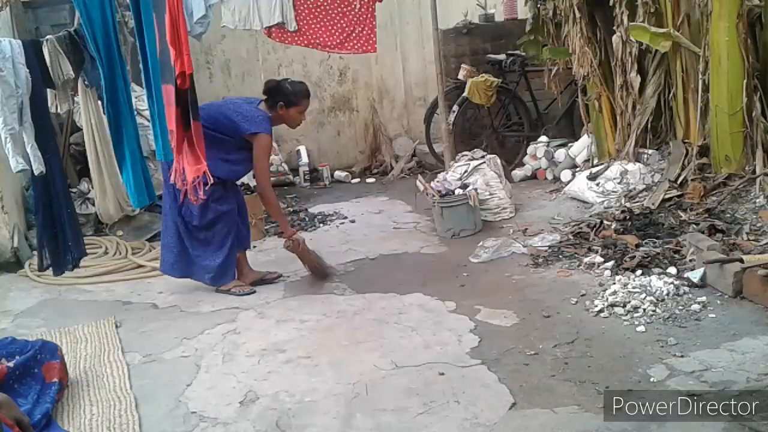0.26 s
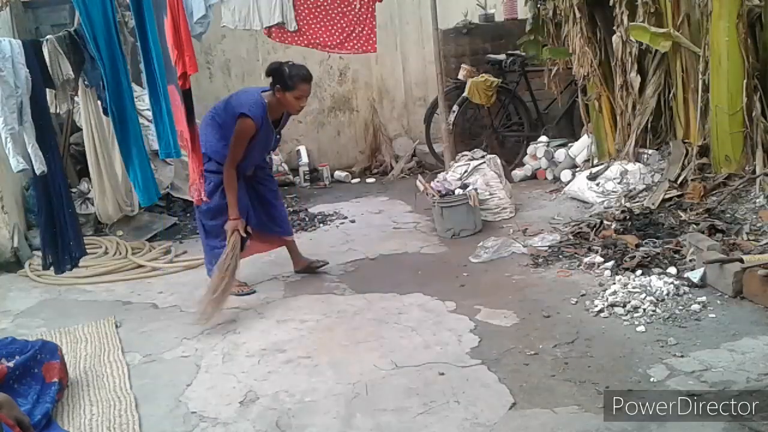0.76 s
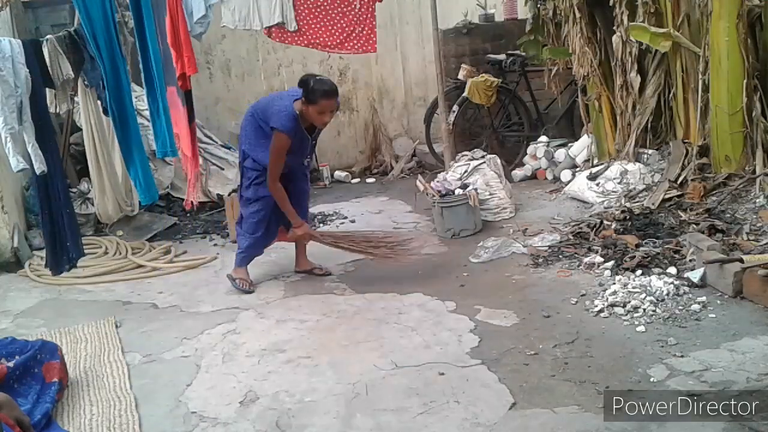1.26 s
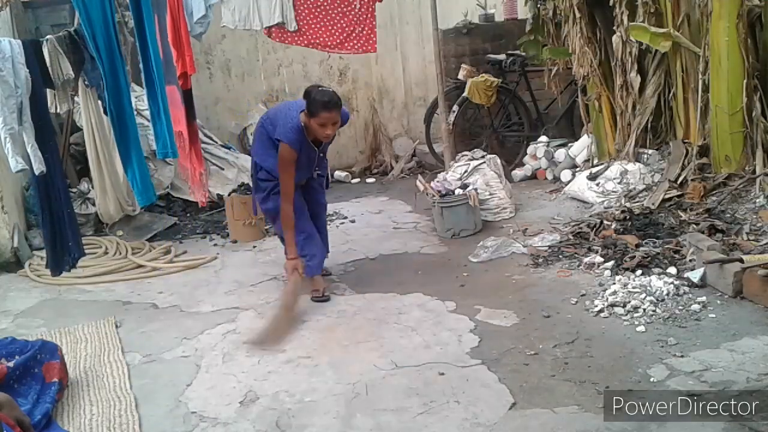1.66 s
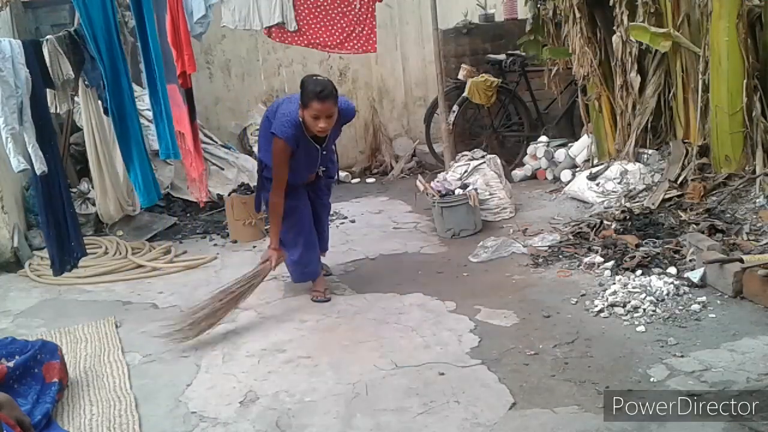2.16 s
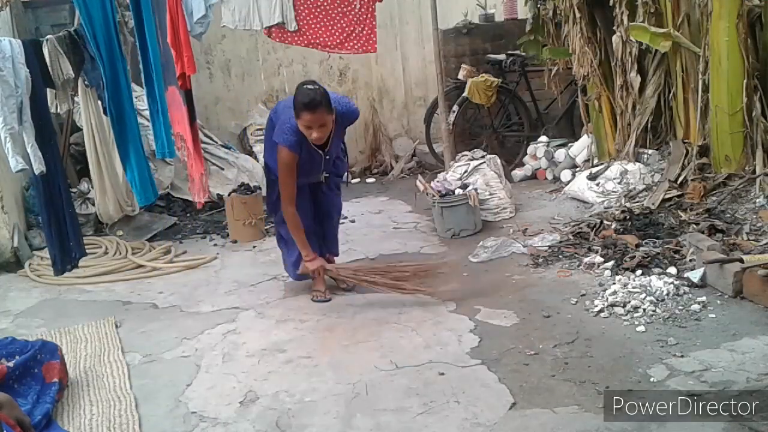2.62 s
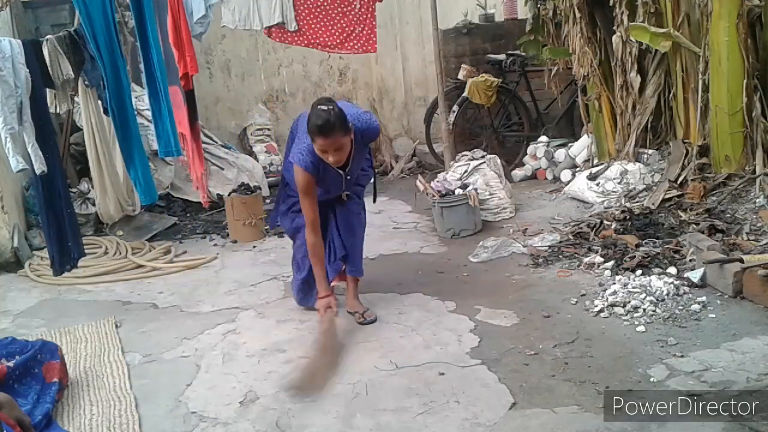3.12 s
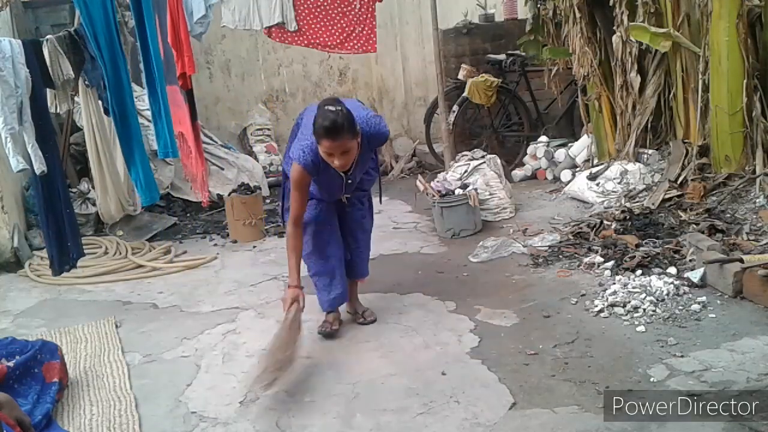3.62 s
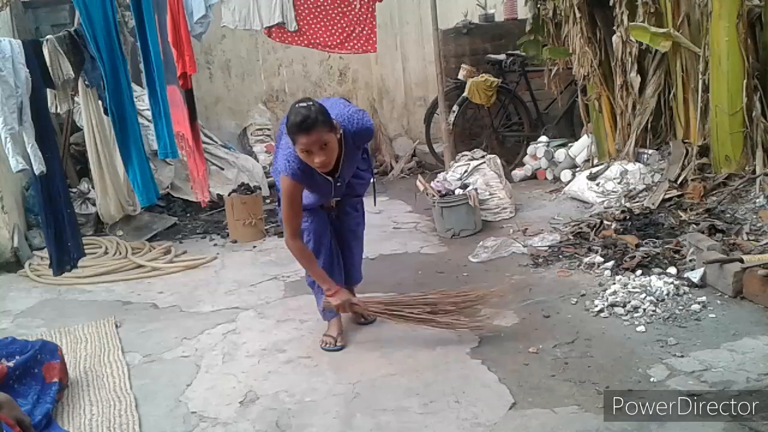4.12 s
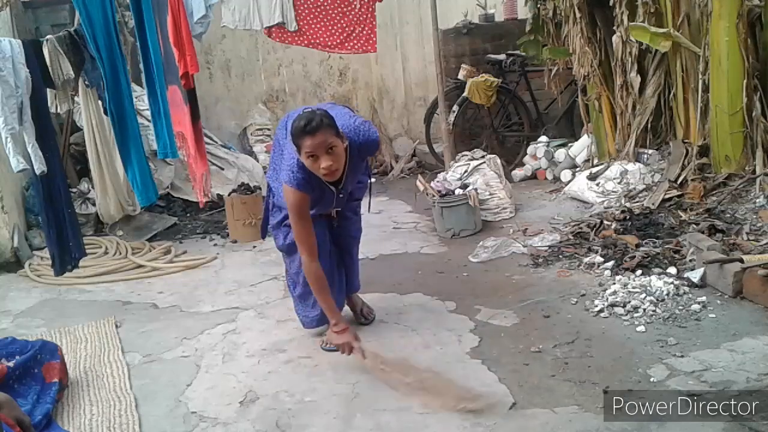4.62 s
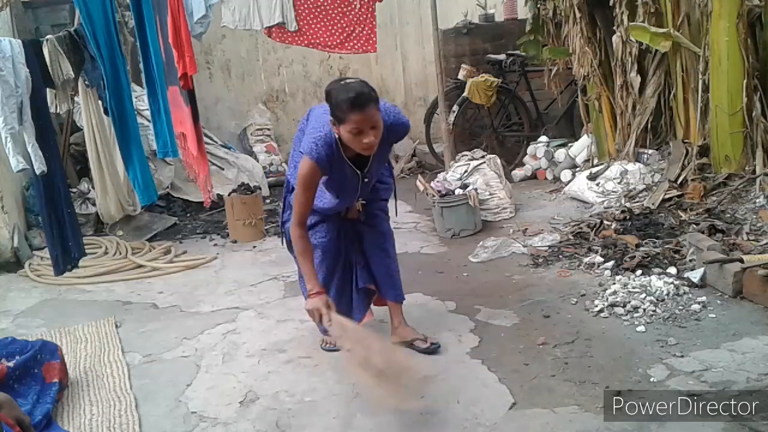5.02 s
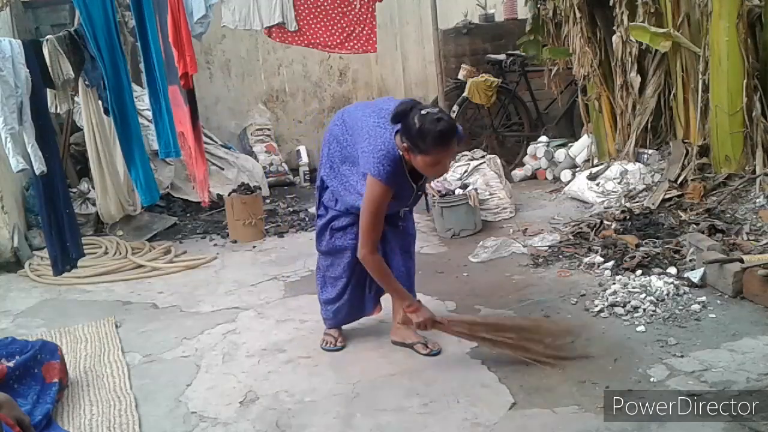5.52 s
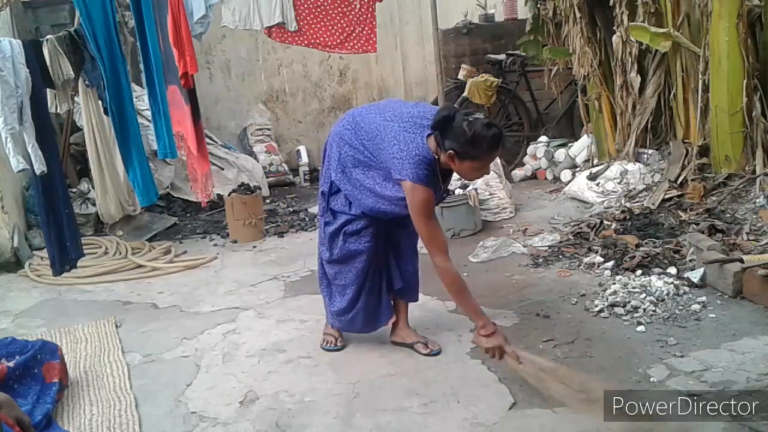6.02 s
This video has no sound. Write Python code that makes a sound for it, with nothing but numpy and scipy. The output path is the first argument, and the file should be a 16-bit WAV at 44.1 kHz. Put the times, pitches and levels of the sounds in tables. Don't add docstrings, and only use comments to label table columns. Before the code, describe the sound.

Dry swishing broom strokes scrape across a walled yard, with scuffs, tiny stone ticks, faint bangle clinks, far crows and low traffic rumble.

```python
import sys
import numpy as np
from scipy import signal
from scipy.io import wavfile
from scipy.ndimage import uniform_filter1d

SR = 44100
rng = np.random.default_rng(int(sys.argv[2]) if len(sys.argv) > 2 else 0)


def int16_out(signal):
    q = np.round(np.clip(np.atleast_2d(signal).T, -1, 1) * 32767)
    wavfile.write(sys.argv[1], SR, q.astype(np.int16))


def invert_db(level):
    return 10 ** (np.asarray(level, dtype=float) / 20)


N = 276727


def evened(x):
    return x / np.sqrt(np.mean(x ** 2) + 1e-20)


def read(points, hz):
    f, value = np.transpose(points)
    return np.interp(np.log(hz + 1), np.log(f + 1), value)


def follow(points, t):
    return np.interp(t, *np.transpose(points))


def add(mix, s, sound):
    part = mix[round(s * SR):][:len(sound)]
    part += sound[:len(part)]


def resonate(x, hz, width):
    turn = np.exp(2j * np.pi * np.cumsum(hz * np.ones(len(x))) / SR)
    r = np.exp(-np.pi * width / SR)
    return 2 * (turn * signal.lfilter([1 - r], [1, -r], x / turn + 1e-18)).real


def steep(x, hz, width):
    return resonate(resonate(resonate(x, hz, width), hz, 2 * width), hz, 3 * width)


def shaped(x, field_db, size=256):
    overlap = size * 3 // 4
    hz, s, z = signal.stft(x, SR, nperseg=size, noverlap=overlap)
    z = z * invert_db(field_db(hz[:, None], s[None]))
    return signal.istft(z, SR, nperseg=size, noverlap=overlap)[1][..., :x.shape[-1]]


def smooth_noise(count, width):
    return evened(uniform_filter1d(rng.standard_normal(count), width))


def patches(shape, tall, wide):
    blobs = rng.standard_normal(shape[::-1]).T
    return evened(uniform_filter1d(uniform_filter1d(blobs, tall, 0), wide, 1))


def arch(t, top_at):
    return np.sin(np.pi / 2 * np.interp(t / t[-1], [0, np.clip(top_at, .1, .9), 1], [0, 1, 2]))


# pitch_hz, level_db (per Hz)
TOWN_AIR = [(35, -1), (92, -4.5), (263, -4), (461, -14), (750, -11.5), (1100, -12), (1780, -11),
            (2240, -18), (3370, -22), (4820, -30.5), (7250, -36), (9130, -48), (11500, -40), (15600, -43)]
# time_s, level_db
FLOCK = [(0, 2), (1.0, 1.5), (1.7, 3), (2.3, -2.5), (3.0, -1), (3.7, -1.5), (4.5, -4), (5.2, 1.5),
         (6.27, 7)]
# pitch_hz, width_hz, level_db
DRONES = [(57.7, 11, -4.5), (79.1, 8.3, 0), (96.6, 27, 0), (123.6, 11.5, -6.5), (156.6, 8.6, -11),
          (181.5, 4.3, -8)]
# time_s, level_db
SURGES = [(0.0, -46), (0.3, -48.5), (0.72, -50.5), (1.17, -49), (1.8, -49.5), (2.1, -51.5), (2.74, -49.5),
          (3.16, -51.5), (3.53, -50.5), (4.07, -52), (4.28, -54.5), (4.93, -52), (5.5, -54), (6.05, -48.5)]


def town():
    def air_db(hz, t):
        flock_db = follow(FLOCK, t) / (1 + ((hz - 1670) / 750) ** 4)
        return read(TOWN_AIR, hz) + flock_db + 1.34 * patches((hz.size, t.size), 30, 10)

    air = shaped(rng.standard_normal(N), air_db, size=2048)
    drones = 0
    for hz, width, db in DRONES:
        drone = resonate(resonate(rng.standard_normal(N), hz, width), hz, 2 * width)
        drones = drones + invert_db(db) * evened(drone)
    t = np.arange(N) / SR
    fall_db_per_s, floor_db = 37, -58.5
    swell_db = np.max([db - fall_db_per_s * abs(t - s) for s, db in SURGES], axis=0)
    return invert_db(-56.5) * evened(air) + invert_db(np.maximum(swell_db, floor_db) - 2.5) * evened(drones)


# pitch_hz, level_db (per Hz)
OWN_HISS = [(60, -5), (100, -30), (266, 10.5), (900, -1.5), (3500, 0), (5500, -11.5), (8300, -21.5),
            (11800, -8), (15600, -7)]
# start_s, low_hz, high_hz, level_db
SPLITS = [
    (1.107, 12400, 14470, -50),
    (1.851, 6200, 7580, -44),
    (2.571, 5770, 7580, -44.5),
    (3.337, 8870, 10340, -54.5),
    (3.407, 5200, 6890, -45),
    (3.43, 4220, 5200, -49),
    (3.871, 5690, 7580, -58),
    (4.707, 5690, 7580, -48),
    (4.8, 10940, 12400, -54),
    (5.473, 5690, 6890, -48.5),
]


def difference():
    side = invert_db(-78) * evened(shaped(rng.standard_normal(N), lambda hz, t: read(OWN_HISS, hz) + 0 * t))
    for s, low, high, db in SPLITS:
        band_pass = signal.butter(6, (low, high), "band", fs=SR, output="sos")
        band = signal.sosfiltfilt(band_pass, rng.standard_normal(2048))
        add(side, s, invert_db(db) * evened(band) * signal.windows.hann(2048) * 1.5)
    return np.array([side, -side])


# start_s, length_s, level_db at the top, beak opening (factor on the throat), hoarseness at the top (0-1)
CAWS = [(0, .34, -54, .62, .85), (.5, .3, -58, .62, .9), (.12, .36, -53, 1.04, .9),
        (.45, .32, -47, 1.0, .8), (.76, .3, -54, 1.04, .8), (1.0, .25, -48, .95, .9),
        (1.75, .2, -52, .85, .9), (2.2, .16, -59, .97, .7), (4.72, .34, -57, 1.0, .8),
        (5.26, .26, -48, 1.12, .6), (5.7, .2, -52, 1.0, .8), (6.02, .16, -51, 1.15, .7),
        (2.33, .27, -50, .99, .35), (5.862, .13, -48, 1.0, .18), (5.957, .11, -47, .99, .18)]
# pitch_hz, width_hz, level_db
THROAT = [(1140, 100, -1), (1540, 250, 2), (1880, 300, -3.5)]
# pitch_hz, width_hz, level_db
NASAL = (3850, 260, -13.5)


def caw(start, length, top_db, opening, top_hoarse):
    t = np.arange(0, length, 1 / SR)
    slack = 1 - arch(t, .45)
    effort_db = top_db - 14 * slack
    rattle_hz = 77 * (1 - .02 * t / length)
    beak = opening * (1 + .02 * (t / length - .5))
    hoarse = np.clip(top_hoarse + 0.27 * slack, 0, 1)
    turns = np.cumsum(rattle_hz * (1 + .1 * hoarse * smooth_noise(len(t), 600))) / SR
    slaps = np.diff(np.floor(turns), prepend=0)
    puffs = (hoarse + np.exp(-(turns % 1) / 0.63)) * rng.standard_normal(len(t))
    drive = (1 - hoarse) * evened(slaps - slaps.mean()) + hoarse * evened(puffs)
    voice = invert_db(NASAL[2]) * steep(drive, *NASAL[:2])
    smear = 1 + .7 * top_hoarse
    for k, (hz, width, db) in enumerate(THROAT):
        voice = voice + (-1) ** k * invert_db(db) * steep(drive, hz * beak, width * smear)
    return start, invert_db(effort_db) * evened(voice) * signal.windows.tukey(len(t), .15)


# pitch_hz, level_db (per Hz)
BRISTLES = [(300, -25), (550, -21), (1000, -18.5), (1900, -10.5), (2500, -11), (3100, -8.5), (4000, -9),
            (5000, -9.5), (6200, -5.5), (8000, -9), (9500, -12), (12000, -10), (13000, -12.5), (15600, -11)]
TIPS_PER_S = 30000


def snaps(count, per_s, spread_db):
    size = invert_db(spread_db * np.minimum(rng.exponential(1, count), 4)) * rng.standard_normal(count)
    return evened(size * (rng.random(count) < per_s / SR))


def broom_colour(hz, rasp_db, fizz_db):
    low = 1 / (1 + (hz / 4700) ** 6)
    high = 1 / (1 + (9000 / (hz + 1)) ** 12)
    return read(BRISTLES, hz) + low * (rasp_db + 6.5) + high * (fizz_db + 7.5)


# start_s (landing), end_s (lift-off), start_level_db, end_level_db (pressure), rasp_db against the hiss
STROKES = [(0.01, 0.065, -38, -33.5, -3), (0.489, 0.539, -40.5, -40, 1), (1.123, 1.28, -39.5, -36.5, -3),
           (1.832, 2.02, -38.5, -37.5, -1), (2.519, 2.746, -37, -38, -3.5), (3.044, 3.06, -60, -54.5, -4),
           (3.242, 3.497, -37.5, -36, -4.5), (3.852, 3.9, -60, -54, 2), (3.968, 4.191, -40, -38.5, -2.5),
           (4.687, 4.916, -42, -38, -2.5), (5.08, 5.12, -62, -58.5, 2.5), (5.423, 5.635, -40, -35, -2.5),
           (6.05, 6.06, -63, -62, -10), (6.169, 6.267, -38.5, -29, -1.5)]
RASP_SHAPE = (4, 0, 0.5, -2.5, 6, 7)
FIZZ_SHAPE = (-11.5, -8, -4, -6.5, -7, -12)
# time_s, level_db
LITTER = [(0, 7.5), (0.6, 4.5), (1.3, 2), (2.0, -4.5), (2.7, -7), (3.5, -9), (4.2, -2.5), (5.0, 2),
          (5.7, 6.5)]
# time_s, level_db (extra pressure), half_length_s
LEANS = [
    (1.26, 4.5, .03),
    (1.95, 3, 0.12),
    (2.6, -2.5, 0.053),
    (2.697, 7, 0.032),
    (3.319, 4, 0.037),
    (4.04, -1, .03),
    (4.11, 5, 0.057),
    (4.74, -2.5, .02),
    (4.812, 4, .06),
    (5.49, -4, 0.021),
]


def stroke_controls(t):
    swing_s, catch_s = 0.071, 0.039
    let_go_s, settle_s = .16, 0.37
    air_s, touch_s = 0.17, 0.02
    power, rasp, fizz = 1e-12, 0, 0
    for land, lift, land_db, lift_db, rasp_db in STROKES:
        steps = [land - swing_s, swing_s - catch_s, catch_s, max(lift - land, .001), let_go_s, settle_s - let_go_s]
        s = np.cumsum(steps)
        litter_db = follow(LITTER, lift)
        times = [s[0] - air_s, s[0] - touch_s, *s, s[-1] + settle_s]
        levels = [land_db - 60, land_db - 30, land_db - 19, land_db - 7, land_db, lift_db,
                  lift_db - 26 + .3 * litter_db, lift_db - 43 + litter_db, lift_db - 60]
        own = invert_db(2 * np.interp(t, times, levels))
        light_db = 0.43 * min(land_db + 46, 0)
        power = power + own
        rasp = rasp + own * (rasp_db + np.interp(t, s, RASP_SHAPE))
        fizz = fizz + own * (np.interp(t, s, FIZZ_SHAPE) + light_db)
    lean_db = sum(db * np.clip(1 - abs(t - s) / half, 0, 1) for s, db, half in LEANS)
    return 10 * np.log10(power) + lean_db, rasp / power - 0.57 * lean_db, fizz / power - 0.42 * lean_db


def broom():
    s = np.arange(0, N + 64, 64) / SR
    press_db, rasp_db, fizz_db = stroke_controls(s)

    def field_db(hz, t):
        colour_db = broom_colour(hz, np.interp(t, s, rasp_db), np.interp(t, s, fizz_db))
        return colour_db + 1.25 * patches((hz.size, t.size), 5, 24)

    hiss = evened(shaped(snaps(N, TIPS_PER_S, 0.49), field_db))
    flutter_db = 0.65 * smooth_noise(N, 500) + 0.11 * smooth_noise(N, 90)
    return hiss * invert_db(np.interp(np.arange(N) / SR, s, press_db) - 0.5 + flutter_db)


# pitch_hz, t60_s
YARD = [(500, 0.7), (2000, 0.76), (7000, 0.5), (14000, 0.089)]


def yard(x):
    taps = np.zeros(SR // 2)
    at = np.arange(200, len(taps) - 20, 20)
    taps[at + rng.integers(0, 20, len(at))] = rng.choice([-1., 1.], len(at))
    tail = shaped(taps, lambda hz, t: -60 * t / read(YARD, hz))
    return signal.fftconvolve(x, tail / np.linalg.norm(tail))[:N]


# start_s, level_db (peak), t60_s, rasp_db, fizz_db
SCUFFS = [(2.999, -47, 0.29, -12, -20), (3.027, -39, 0.26, -11, -20), (3.8112, -35.5, 0.14, -14, -17),
          (3.924, -29, .15, -11, -2), (4.5017, -66, .15, -11, -13), (4.642, -37, 0.17, -16, -10),
          (5.071, -28.5, 0.13, -6, -10), (5.105, -39, 0.41, -6, -14), (5.135, -37, 0.27, -3, -6),
          (5.318, -43, 0.25, -19, -8), (6.104, -38, 0.16, -6, -6), (2.9514, -46, .03, -15, -4),
          (3.0874, -50, .03, -8, -3), (5.8394, -51, .03, -8, 0), (5.456, -20, 0.018, -10, -10),
          (2.3595, -49, .03, -8, -4), (3.12, -48, .2, -8, -12), (0.39, -48, .3, -4, -14),
          (0.64, -43, .3, -4, -10)]


def scuff(db, t60, rasp_db, fizz_db):
    t = np.arange(SR // 5) / SR
    grit = snaps(len(t), TIPS_PER_S, spread_db=2.0)
    grit = evened(shaped(grit, lambda hz, s: broom_colour(hz, rasp_db, fizz_db)))
    rise = np.minimum(t / (0.036 * t60), 1)
    return grit * invert_db(db - 15.0 - 60 * t / t60) * rise * np.linspace(1, 0, len(t))


# start_s, length_s, pitch_hz, level_db (top), glide_hz_per_s
COOS = [
    (4.74, .1, 1030, -65, -50),
    (5.3, .12, 900, -64, -140),
    (4.3, .3, 268, -67, -30),
    (4.68, .22, 563, -66, 20),
    (5.05, .25, 566, -64, -10),
    (5.18, .1, 750, -66, 0),
    (.8, .2, 3160, -77, -200),
    (4.47, .1, 3500, -76, 0),
]


def dove(start, length, hz, top_db, glide):
    t = np.arange(0, length, 1 / SR)
    tone = np.sin(2 * np.pi * np.cumsum(hz + glide * (t - length / 2)) / SR)
    waver_db = 2.6 * smooth_noise(len(t), 1200)
    level_db = top_db - 9 * (1 - arch(t, 0.35)) + waver_db
    return start, invert_db(level_db) * evened(tone) * signal.windows.tukey(len(t), .15)


# start_s, level_db (peak), pitch_hz, t60_s
TICKS = [
    (1.0295, -52, 1900, .01),
    (1.6402, -42, 1750, 0.0077),
    (2.1926, -40, 1510, 0.009),
    (2.3435, -50, 1460, .01),
    (3.0855, -49, 2580, .01),
    (3.089, -54, 2600, 0.0092),
    (4.598, -70, 1400, 0.009),
]


def tick(db, hz, t60):
    t = np.arange(1000) / SR
    modes = np.sin(2 * np.pi * hz * t) + 0.62 * np.sin(2 * np.pi * hz * 1.74 * t)
    return invert_db(db - 60 * t / t60) * modes


# start_s, level_db (peak), middle_db (middle modes against the upper)
CLINKS = [
    (2.3466, -67, -5),
    (2.3595, -57.5, 6),
    (3.0849, -58, -3),
    (5.876, -63, 0),
    (5.9235, -64, 4),
    (6.0292, -45.5, -2),
]
# pitch_hz, level_db, t60_s
BANGLE = [(3980, -12, .06), (5800, -3, .2), (6300, -6, .12), (7120, -17, .16), (7300, -4.5, 0.064),
          (8300, -16, .04), (10500, -14, .05), (10940, -8, 0.23), (11350, -2, .07), (11700, -3, 0.12),
          (12100, -12, .04), (13600, -13, .04), (15200, -11, .06)]


def clink(db, middle_db):
    t = np.arange(SR // 4) / SR
    ring = 0
    for hz, level, t60 in BANGLE:
        mode_db = level + middle_db * (6500 < hz < 9000) - 5 * (hz < 6500)
        for pair in (.996, 1.004):
            tone = np.sin(2 * np.pi * hz * pair * t + rng.uniform(0, 2 * np.pi))
            ring = ring + invert_db(mode_db - 60 * t / t60) * tone
    crack = np.diff(rng.standard_normal(len(t) + 1)) * invert_db(-3 - 60 * t / .035)
    knocks = np.zeros(400)
    knocks[rng.integers(60, 400, 2)] = 0.21
    knocks[0] = 1
    strike = (ring + crack) * np.minimum(t / 0.0011, 1)
    return invert_db(db - 10.5) * np.convolve(strike, knocks)


def scene():
    near, far = broom(), np.zeros(N)
    for rows, source in ((SCUFFS, scuff), (CLINKS, clink), (TICKS, tick)):
        for s, *rest in rows:
            add(near, s, source(*rest))
    for rows, source in ((CAWS, caw), (COOS, dove)):
        for row in rows:
            add(far, *source(*row))
    mid = near + 0.58 * far + yard(invert_db(-14) * near + 0.46 * far) + town()
    return np.array([mid, mid])


def band_limit(x):
    return signal.sosfilt(signal.butter(12, 16780, fs=SR, output="sos"), x)


def record(dry):
    port_hz, port_width_hz, port_gain = 7220, 768, 2.59
    heard = dry[0] + port_gain * resonate(dry[0], port_hz, port_width_hz) + difference()
    cut = signal.sosfilt(signal.butter(10, 47, "high", fs=SR, output="sos"), heard)
    top_cut = signal.firwin(1023, 15615, window=("kaiser", 10), fs=SR)
    finished = signal.oaconvolve(cut, top_cut[None], "same") - .0006
    return band_limit(finished)


dry = scene()
out = record(dry)
int16_out(out)
```